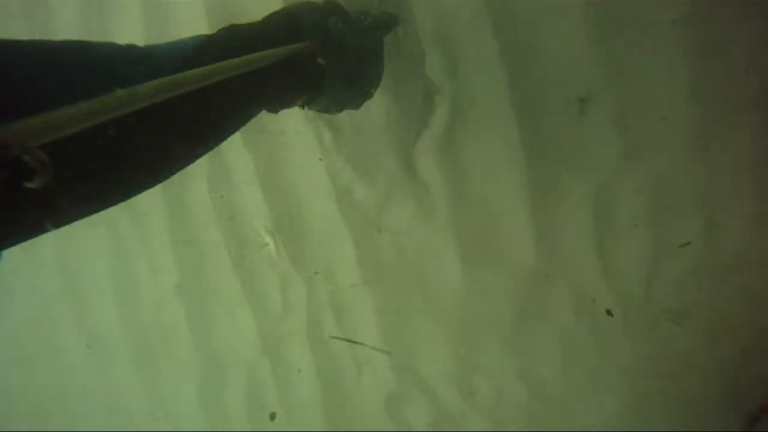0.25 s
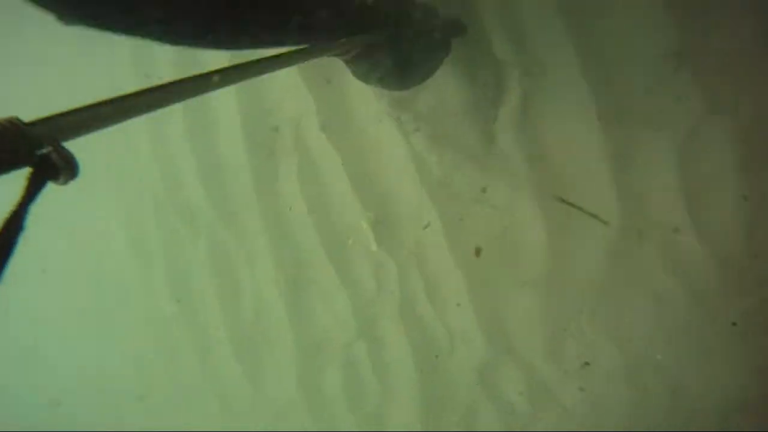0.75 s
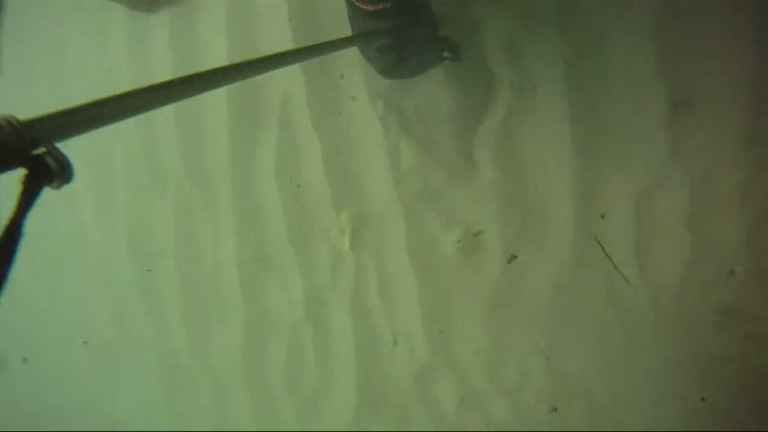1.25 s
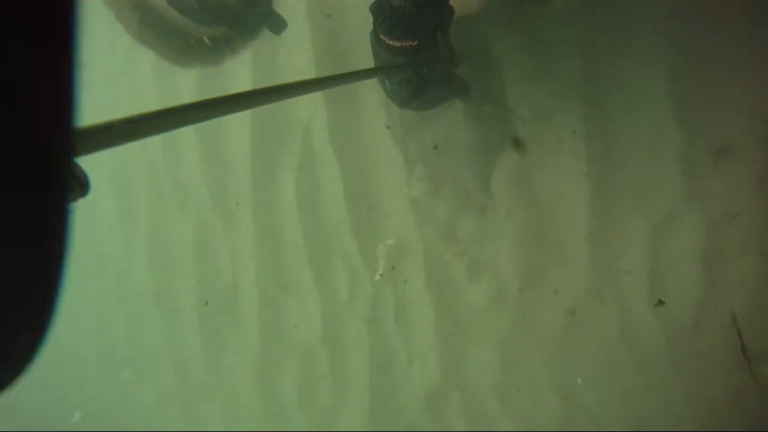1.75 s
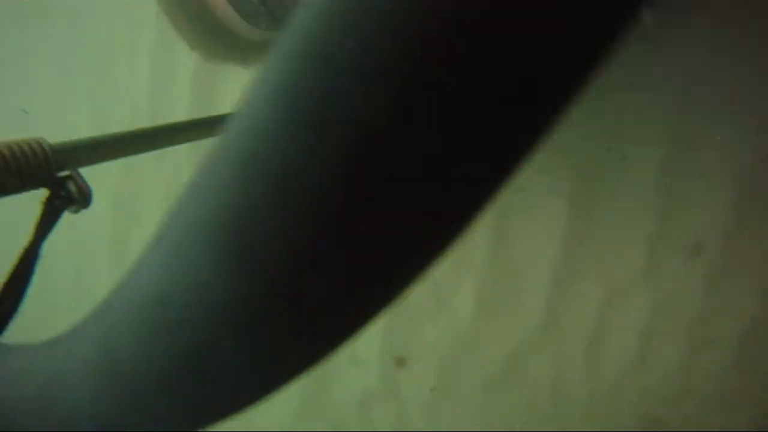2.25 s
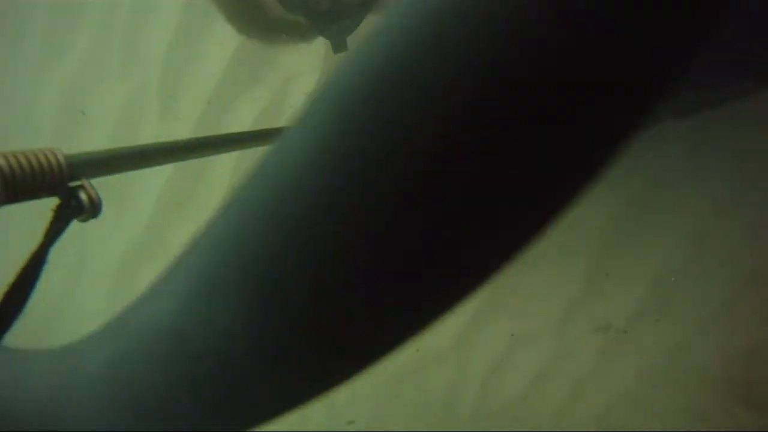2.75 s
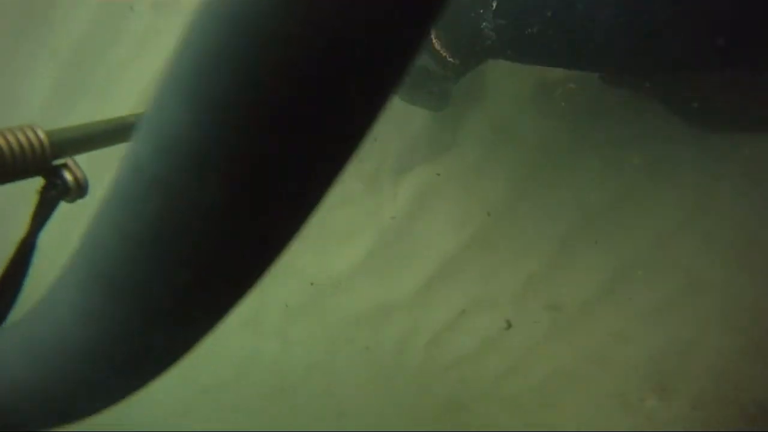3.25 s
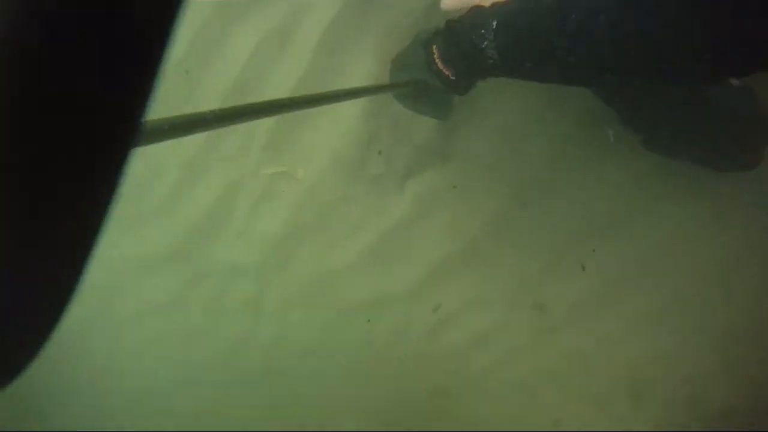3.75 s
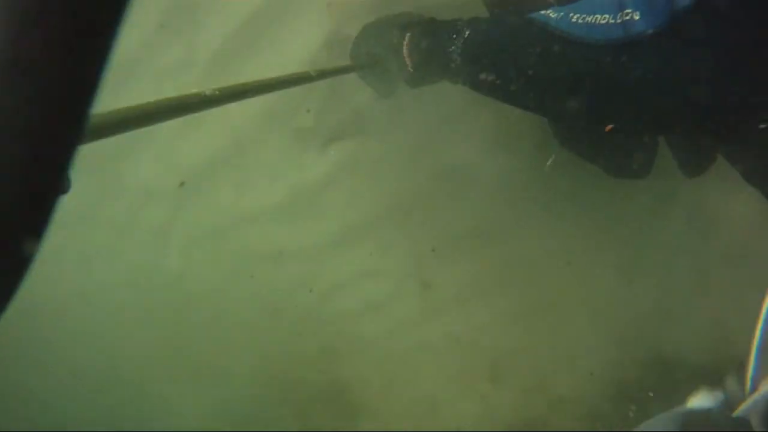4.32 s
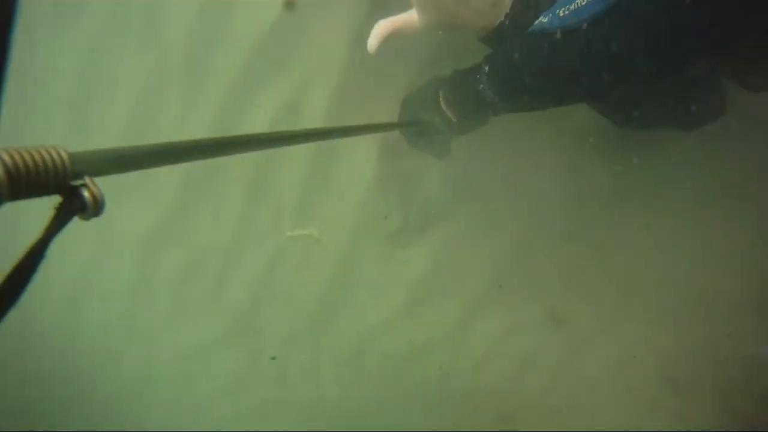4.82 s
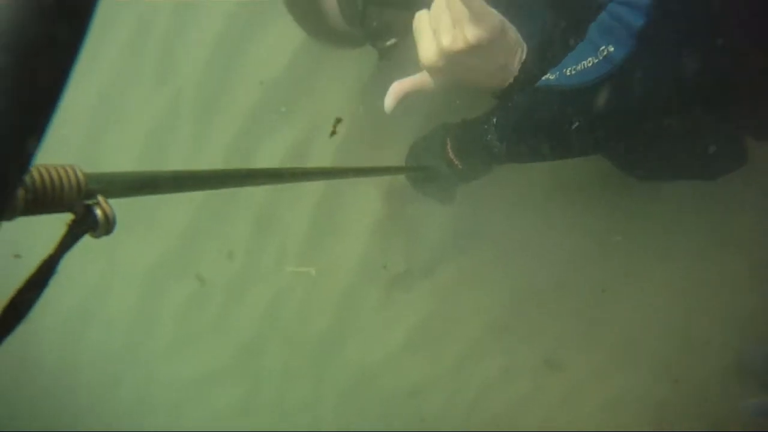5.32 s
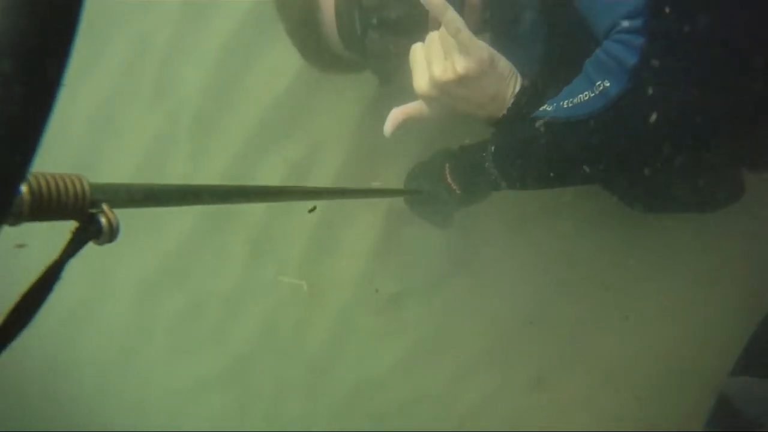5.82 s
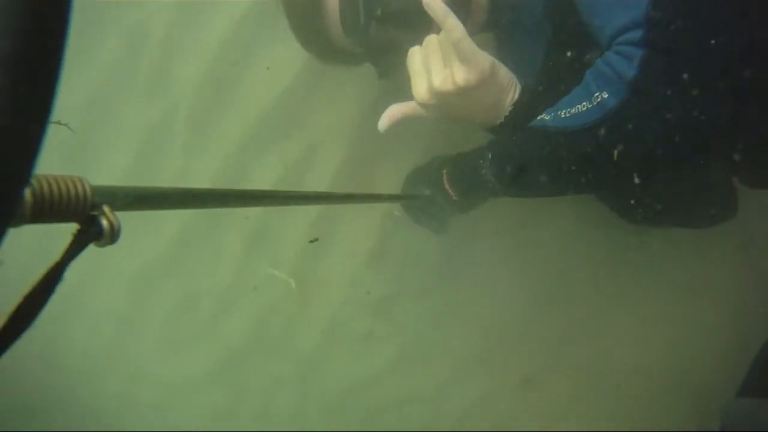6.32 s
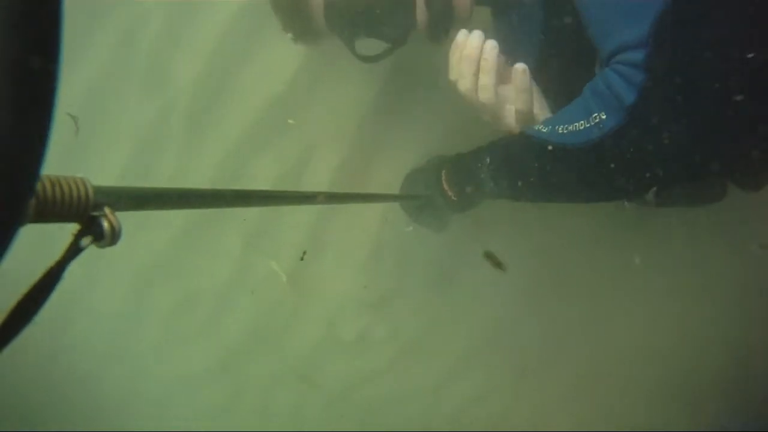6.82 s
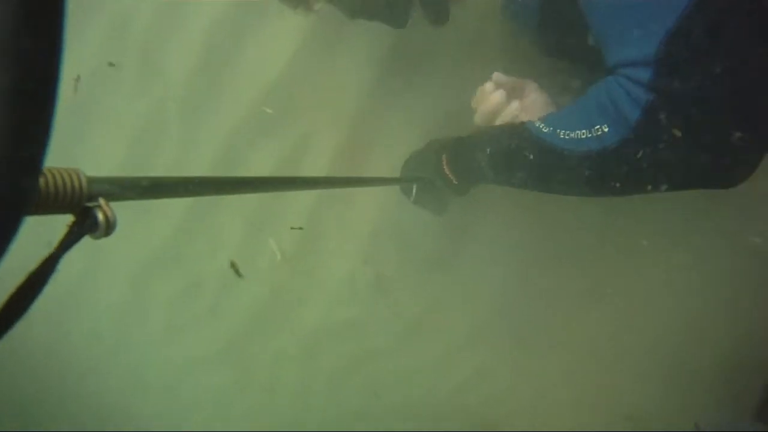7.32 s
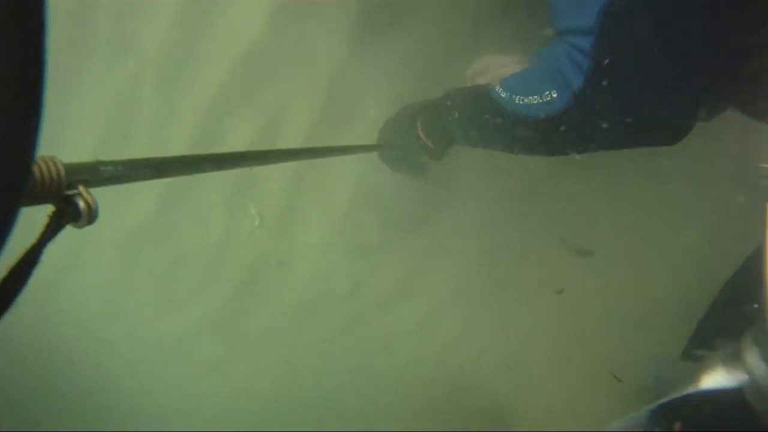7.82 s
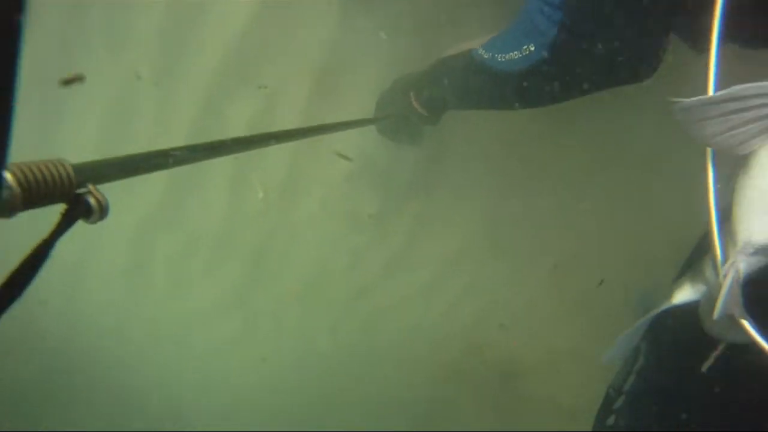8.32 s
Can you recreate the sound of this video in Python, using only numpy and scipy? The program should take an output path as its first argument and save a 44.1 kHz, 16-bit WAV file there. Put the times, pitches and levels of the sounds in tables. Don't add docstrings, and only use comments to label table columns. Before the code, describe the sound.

Close, boxed-in underwater handling noise. Hands and line rub a plastic-like shell while water rocks it with low rumble. A fish beats the spear shaft in irregular short knocks, strongest in the first second, around four seconds and at the end, with brief metallic clinks and scrapes between. Around six to seven seconds it nearly falls quiet. Dry, no echo, crunchy low sampling quality.

```python
import sys
import numpy as np
from scipy import signal
from scipy.fft import rfft, irfft, next_fast_len
from scipy.io import wavfile
from scipy.ndimage import uniform_filter1d, map_coordinates

SR = 44100
rng = np.random.default_rng(int(sys.argv[2]) if len(sys.argv) > 2 else 0)


def volts_from_decibels(level):
    exponent = np.asarray(level, float) / 20
    return 10 ** exponent


def to_wav(sig):
    pcm = np.clip(np.atleast_2d(sig), -1, 1) * 32767
    pcm = np.round(pcm).astype(np.int16)
    wavfile.write(sys.argv[1], SR, pcm.T)


N = 377937


def unit(x):
    return x / np.sqrt(np.mean(x ** 2) + 1e-20)


def curves(rows):
    s, *cols = np.transpose(rows)
    return [np.interp(np.arange(N) / SR, s, c) for c in cols]


def wobble(rate_hz):
    knots = rng.standard_normal(int(N * rate_hz / SR) + 4)
    return map_coordinates(knots, [np.arange(N) * rate_hz / SR])


def filtered(x, response):
    m = next_fast_len(len(x) + SR // 2)
    return irfft(rfft(x, m) * response(np.fft.rfftfreq(m, 1 / SR)), m)[:len(x)]


def band(x, low_hz, high_hz):
    return signal.sosfilt(signal.butter(4, [low_hz, high_hz], "bandpass", fs=SR, output="sos"), x)


def coloured(spectrum):
    f, db = np.transpose(spectrum)
    return unit(filtered(rng.standard_normal(N), lambda hz: volts_from_decibels(np.interp(np.log(hz + 1), np.log(f), db))))


def resonant(x, peaks):
    def response(f):
        total = 0
        for k, (hz, width_hz, db) in enumerate(peaks):
            damping = 1j * f * width_hz
            total = total + (-1) ** k * volts_from_decibels(db) * damping / (hz * hz - f * f + damping)
        return total
    return filtered(x, response)


def gritty(grit_db, rate_hz):
    return rng.standard_normal(N) * volts_from_decibels(grit_db * wobble(rate_hz))


# t/s, level/dB
GRIP = [(0.0, -35.5), (0.81, -37.5), (1.6, -43), (2.1, -41), (2.53, -39.5), (2.74, -48), (3.7, -40),
        (3.98, -35.5), (4.46, -35), (4.75, -31), (4.94, -39), (6.01, -53.5), (6.3, -48), (7.81, -44),
        (7.95, -36), (8.07, -30), (8.19, -52.5), (8.57, -45.5)]


def grip_level():
    return curves(GRIP)[0]


# f/Hz, width/Hz, level/dB
HUM = [(750.5, 81, 0)]


def hum():
    noise = rng.standard_normal(N)
    return volts_from_decibels(grip_level() - 6) * unit(resonant(resonant(noise, HUM), HUM))


# t/s, level/dB
WATER = [(0.0, -33.5), (0.31, -25.5), (0.55, -37.5), (0.83, -23.5), (1.65, -39.5), (1.72, -31),
         (2.6, -38.5), (2.79, -23), (2.89, -33.5), (4.77, -28.5), (5.06, -42.5), (5.13, -35), (6.32, -58),
         (7.16, -44.5), (7.21, -36), (7.49, -49), (7.9, -31), (8.57, -26)]
# f/Hz, level/dB per Hz
SWAY = [(7, -44.5), (14, -13.5), (21, 11.5), (28, -3.5), (40, -7.5), (60, -19), (130, -86)]


def water_sway():
    sway_db, = curves(WATER)
    rock = coloured(SWAY)
    steady = np.sqrt(uniform_filter1d(rock ** 2, size=SR // 6) + 0.08)
    return volts_from_decibels(sway_db + 2.5) * unit(rock / steady)


def wash():
    kicks, t = np.zeros(N), np.arange(SR // 2) / SR
    for s, db, _, thud_db, _ in BEATS + JOLTS:
        kicks[round(s * SR)] = volts_from_decibels(db + thud_db - 11)
    decay_s = 0.027
    return np.abs(signal.fftconvolve(kicks, np.exp(-t / decay_s))[:N])


# f/Hz, level/dB per Hz
RUMBLE = [(30, -65), (60, -3), (110, -5), (190, -9), (300, -8.5), (520, -10.5), (650, -23), (1200, -77.5)]


def rumble(catch):
    churn = volts_from_decibels(-49 + grip_level() + 42.5) + wash()
    return churn * unit(volts_from_decibels(1.8 * wobble(14) + 1.6 * catch) * coloured(RUMBLE))


# middle t/s, level/dB, share on metal/dB, half length/s
STROKES = [(3.297, -64, -31, .06), (8.334, -47, -16, 0.018), (8.425, -37.5, -17, 0.029),
           (0.01, -38, -46, 0.094), (0.386, -32, -19, 0.14), (0.673, -32.5, -15.5, 0.069),
           (0.975, -33.5, -24, 0.1), (1.29, -41.5, -17.5, 0.17), (1.434, -36, -16, 0.043),
           (1.648, -39.5, -6, 0.031), (1.85, -44, -8.5, 0.11), (2.043, -42.5, -9.5, 0.032),
           (2.226, -35, -11, 0.042), (2.47, -35.5, -30, 0.044), (3.008, -34, -32.5, 0.044),
           (3.159, -39.5, -42, 0.062), (3.426, -39, -16.5, 0.053), (3.586, -33, -26.5, 0.068),
           (3.758, -34.5, -26, 0.053), (4.123, -37, -19.5, 0.091), (4.345, -32, -16, 0.045),
           (4.54, -30, -25, 0.12), (4.708, -51, -6.5, 0.097), (4.873, -33.5, -19.5, 0.051),
           (5.195, -40.5, -25, 0.056), (6.343, -46, -27, 0.14), (7.181, -38.5, -44, 0.047),
           (7.36, -46, -47, 0.043), (7.783, -40, -12, 0.05), (7.93, -35.5, -20, 0.052),
           (8.156, -31, -23, 0.018), (8.51, -53, -14, 0.01)]


def strokes():
    s, db, metal_db, half_s = np.transpose(STROKES)[:, :, None]
    t = np.arange(0, N, SR // 200) / SR
    bells = volts_from_decibels(db) * np.exp(-np.square((t - s) / half_s))
    shell, metal = curves(np.transpose([t, bells.sum(axis=0), (volts_from_decibels(metal_db) * bells).sum(axis=0)]))
    return shell, metal + volts_from_decibels(-63 + 0.49 * (grip_level() + 41.5))


# f/Hz, width/Hz, level/dB
RUSTLE = [(334, 28, -17.5), (414, 43, -7.5), (725.4, 37, 0.5), (879, 136, -0.5), (1078, 145, -9)]
# f/Hz, width/Hz, level/dB
BED = [(350, 52, -15), (757, 56, 0), (862, 86, 1), (1130, 60, -7.5)]
# f/Hz, width/Hz, level/dB
RASP = [(934, 109, 4.5), (1090, 103.4, 0), (1234, 56, -11)]
# f/Hz, width/Hz, level/dB
GRAZE = [(1550, 120, -1.5), (1804, 140, 1.5), (1890, 410, -5), (2690, 390, -10.5)]


def rubbing(catch):
    shell, metal = strokes()
    hold = volts_from_decibels(grip_level() - 8.5)
    force = volts_from_decibels(2.54 * catch) * gritty(2.38, 150)
    rustle = volts_from_decibels(4) * shell * unit(resonant(force, RUSTLE))
    bed = volts_from_decibels(-1) * hold * unit(resonant(force, BED))
    hardness = (volts_from_decibels(47) * shell + volts_from_decibels(43.5) * hold) ** 1.154
    rasp = volts_from_decibels(-45.5) * hardness * unit(resonant(force, RASP))
    graze = volts_from_decibels(-1) * metal * unit(volts_from_decibels(1.6 * catch) * resonant(gritty(4.5, 200), GRAZE))
    return band(rustle + bed + rasp, 90, 1650) + graze


def handling():
    catch = wobble(28)
    return water_sway() + rumble(catch) + rubbing(catch)


# t/s, level/dB, f/Hz, length/s
BUMPS = [(0.002, -24.5, 187, 0.01), (0.395, -30, 150, .015), (0.575, -30, 170, .012),
         (0.745, -23.5, 165, 0.018), (0.867, -25.5, 59, 0.035), (0.93, -27, 60, .02),
         (1.414, -26, 290, 0.0095), (1.93, -27, 311, 0.006), (2.507, -31, 327, 0.026),
         (2.712, -25.5, 46, 0.023), (2.72, -29, 201, 0.005), (3.241, -36, 327, 0.013),
         (3.427, -24, 43, 0.015), (3.87, -24, 75, 0.012), (3.9, -24, 50, .012), (4.27, -32, 230, .015),
         (4.47, -29, 230, .015), (5.12, -24, 48, 0.031), (5.12, -27, 130, 0.021), (5.452, -45, 46, 0.033),
         (6.405, -41, 90, 0.018), (7.138, -36, 245, 0.019), (7.165, -35.5, 63, 0.021),
         (7.777, -22, 89, 0.015), (7.893, -25, 52, 0.026), (8.079, -19, 62, 0.04), (8.32, -42, 300, .01),
         (8.416, -30, 73, 0.04)]


def bumps():
    out, t = np.zeros(N + SR), np.arange(SR // 3) / SR
    for s, db, hz, length_s in BUMPS:
        u = t / length_s
        swing = np.sin(2 * np.pi * hz * (t + 0.3 * length_s * (1 - np.exp(-u))))
        churn = band(rng.standard_normal(3 * len(t)), 0.6 * hz, 1.7 * hz)[-len(t):]
        out[round(s * SR):][:len(t)] += volts_from_decibels(db + 5) * u * np.exp(-u) * (swing + volts_from_decibels(-4) * unit(churn))
    return out[:N]


# t/s, level/dB, bright edge/dB, length/s
CLINKS = [(0.91, -35, 11, 0.013), (1.2047, -19, -3, 0.023), (1.267, -29, 1.5, 0.0044),
          (1.718, -28.5, -7, 0.017), (1.866, -29.5, 3, 0.012), (2.003, -35.5, 15.5, 0.012),
          (2.095, -20.5, -3.5, 0.0098), (2.152, -21.5, -1, 0.0043), (2.239, -33, 13.5, 0.0038),
          (2.262, -32, -4, 0.0058), (2.9244, -28.5, 4, 0.0041), (4.065, -26, -5.5, 0.012),
          (4.919, -29.5, 0.5, 0.0099), (5.0215, -24.5, 6, 0.0074), (5.319, -42.5, -1, 0.02),
          (5.879, -32.5, 7, 0.018), (6.299, -32.5, -2, 0.018), (7.623, -39.5, 3.5, 0.021),
          (8.077, -25.5, 2, 0.013), (8.129, -15, -2.5, 0.0046), (8.164, -23, -1, 0.0042),
          (8.4, -22.5, 4.5, 0.0027), (0.489, -23, 8, .003)]
# t/s, level/dB, bright edge/dB
SCUFFS = [(0.06, -38, -1), (0.4612, -31, 7), (0.4798, -32.5, 5), (1.443, -32, 5), (1.5337, -31.5, 7.5),
          (1.919, -36, 4), (2.176, -28.5, 3), (2.205, -43, 9), (2.244, -35, 11), (2.776, -29, 16.5),
          (3.396, -29, 1.5), (3.722, -37.5, 8), (3.756, -26, 3), (4.137, -27, 5), (4.222, -31, 1),
          (4.3, -24.5, 3.5), (4.373, -38, 3), (4.627, -24.5, 9.5), (4.851, -44, -18), (5.6454, -36.5, 0.5),
          (8.399, -35, 6)]
# t/s, level/dB
TICKS = [(0.7427, -44), (0.845, -47.5), (1.401, -46), (2.342, -52), (2.567, -47), (3.646, -60),
         (4.014, -45.5), (4.18, -48), (5.288, -53.5), (5.404, -51), (5.6, -46), (5.748, -52.5),
         (5.782, -51), (6.089, -44.5), (6.458, -49.5), (6.561, -52.5), (6.613, -48.5), (6.755, -59),
         (6.829, -52), (6.853, -51), (6.891, -52), (7.235, -58.5), (7.054, -44), (7.559, -48.5),
         (8.2, -50.5), (8.235, -52.5), (8.314, -51), (8.337, -57)]
# t/s, level/dB, body/dB, bright edge/dB, length/s
DRAGS = [(0.628, -26.5, 10, 10, 0.028), (1.296, -26, 4, 2, 0.038), (1.574, -43, 4, 3.5, 0.0089),
         (0.765, -36.5, 15, 8, 0.028), (1.699, -35.5, 3.5, -5, 0.12), (1.782, -50, 9, -4, 0.052),
         (1.865, -42.5, 2, 12.5, 0.051), (1.92, -43, 3, 12.5, 0.084), (2.182, -48.5, 0, 12, 0.015),
         (8.406, -44, 19, 6, 0.024), (2.6626, -15, 2.5, 1, 0.02), (2.686, -26.5, 3, -0.5, 0.04),
         (7.164, -67, 31, 1, 0.057)]
# middle t/s, level/dB, body/dB, bright edge/dB, half length/s
SWELLS = [(0.875, -23, 1.5, -3.5, .014), (0.934, -27.5, -1, 6, 0.011), (0.951, -24.5, 11, 7, 0.0053),
          (0.969, -28, 17, 11.5, 0.0029), (2.805, -32, 11, 10, 0.01), (8.232, -53.5, -10, 1, 0.023),
          (1.34, -36, 9.5, 1, 0.0083), (1.595, -39.5, 13, 6, 0.0056), (1.752, -32, -14, -2, 0.0063),
          (1.78, -45, -16, -4, 0.0057), (1.844, -37.5, 8.5, 3, 0.017), (1.655, -39.5, 5, -4, 0.012),
          (1.9, -45.5, -6, 4, .02), (1.963, -49.5, -1, 14, 0.023), (1.174, -48, -9, 10, 0.011),
          (2.212, -27.5, 12.5, 6.5, 0.014), (2.257, -20.5, 5.5, 8.5, 0.0052),
          (2.293, -22, 1.5, 5.5, 0.0099), (4.51, -53, 4, 9, 0.021), (7.197, -73, 24, -4, 0.015),
          (7.325, -58, 19.5, 3, 0.025), (7.984, -47.5, 23, 3, 0.012), (8.138, -34, 18, -1, 0.011)]
# f/Hz, width/Hz, level/dB
METAL = [(1400, 250, -18), (1655, 45, 0), (1770, 55, -1)]
# f/Hz, width/Hz, level/dB
EDGE = [(2015, 200, -5), (2256, 94, -2.5), (2542, 230, -3.5), (2986, 490, -16)]
# f/Hz, width/Hz, level/dB
SCUFF = [(343, 43, -5), (531, 76, -6), (766, 76, 2), (950, 254, -2.5), (1137, 161, 0)]
# f/Hz, width/Hz, level/dB
LOOSE = [(1150, 77, 9), (760, 72, -12)]


def scrapes():
    grip, t = np.zeros((4, N + SR)), np.arange(SR // 8) / SR
    contacts = [(s, db, 0.5, edge_db, length_s) for s, db, edge_db, length_s in CLINKS]
    contacts += [(s, db, 10.5, edge_db, 0.0075) for s, db, edge_db in SCUFFS]
    contacts += [(s, db, -3.5, 9.5, 0.015) for s, db in TICKS]
    for rows, stop, bite in ((contacts, 1.6, 1.2), (DRAGS, 4.5, 0.3)):
        onset = (1 - np.exp(-t / 0.0021)) * (1 + bite * np.exp(-t / 0.00058))
        for s, db, body_db, edge_db, length_s in rows:
            drag = np.exp(-(t / length_s) ** stop) * onset
            level = volts_from_decibels(db + np.array([[-5], [edge_db - 12.5], [body_db - 5.5]]))
            grip[:3, round(s * SR):][:, :len(t)] += level * drag
    middle = t[-1] / 2
    for s, db, body_db, edge_db, half_s in SWELLS:
        bell = np.exp(-np.abs((t - middle) / half_s) ** 2.7)
        level = volts_from_decibels(db + np.array([[-5], [edge_db - 15], [body_db - 8.5]]))
        grip[:3, round((s - middle) * SR):][:, :len(t)] += level * bell
    for s, db in TICKS:
        grip[3, round(s * SR):][:len(t)] += volts_from_decibels(db + 0.5) * np.exp(-t / 0.014) * (1 - np.exp(-t / 0.001))

    happens = rng.random((3, N)) < 1700 / SR
    jerks = happens * rng.uniform(-0.83, 1, (3, N)) * volts_from_decibels(0.65 * wobble(140))
    jerks[:, [round((row[0] + 0.0015) * SR) for row in contacts + DRAGS]] = 0.76
    out = np.zeros(N)
    for force, gain, body in zip([*jerks, jerks[2]], grip, (METAL, EDGE, SCUFF, LOOSE)):
        out += resonant(force * gain[:N], body) / np.std(resonant(force[:SR], body))
    return out


def ring(modes, t, favour_hz, focus_db):
    hz, db, t60_s = np.transpose(modes)[:, :, None]
    chance = rng.standard_normal(hz.shape)
    level_db = db + 1.5 * chance - focus_db * np.abs(np.log2(hz / favour_hz))
    detuned_hz = hz * (1 + 0.016 * chance[::-1])
    return np.sum(volts_from_decibels(level_db - 60 * t / t60_s) * np.sin(2 * np.pi * detuned_hz * t), axis=0)


# f/Hz, level/dB, t60/s
SHELL = [(715, 9.5, 0.024), (773, -10.5, 0.034), (822, -10.5, 0.055), (914.5, 7, 0.028),
         (1132.3, -7.5, 0.047), (1110, -6.5, 0.045)]
# f/Hz, level/dB, t60/s
FRAME = [(138.5, -4.5, 0.17), (167.5, -7.5, 0.25), (230, -4, 0.11), (350.3, -7, 0.091), (433.5, 3, 0.052),
         (520, -3.5, 0.071)]


def blow(hz, thud_hz, push_s, low_hz, high_hz):
    t = np.arange(SR // 8) / SR
    early = t[:SR // 14]
    u = early / push_s
    rough = rng.standard_normal(len(u))
    judder = volts_from_decibels(-29.5) * np.minimum(u, 1) * np.exp(-early / 0.023) * rough
    push = u ** 3 * np.exp(-1.7 * u) * rough + judder
    shove = volts_from_decibels(-12.5) * np.exp(-((u - 1.5) / 0.22) ** 2) + 0.3 * push
    chord = ring(SHELL, t, hz, focus_db=30)
    clean = chord * (1 - np.exp(-t / (1.44 * push_s))) ** 2
    juddered = signal.fftconvolve(chord, push)[:len(t)]
    high = band(unit(clean) + volts_from_decibels(-3.5) * unit(juddered), low_hz, high_hz)
    low = band(signal.fftconvolve(ring(FRAME, t, thud_hz, focus_db=7), shove)[:len(t)], 110, 574)
    return high / np.abs(high).max(), low / np.abs(low).max()


# t/s, level/dB, ring f/Hz
TAPS = [(0.848, -14.5, 910), (0.921, -19, 950), (1.205, -14.5, 1110), (1.929, -12.5, 950),
        (1.937, -16, 950), (2.094, -9.5, 1130), (2.199, -16.5, 1110), (5.025, -19.5, 1090),
        (5.598, -28, 910), (5.643, -24, 1170), (5.878, -21, 1110), (6.085, -47, 1150), (6.3, -25.5, 1200)]
# t/s, level/dB, ring f/Hz, thud/dB, thud f/Hz
JOLTS = [
    (2.982, -20, 970, 2.5, 230),
    (3.363, -26, 790, -1, 230),
    (3.866, -51, 950, 23.5, 160),
    (3.965, -20, 1000, 4.5, 230),
    (4.465, -15.5, 724, -10.5, 230),
    (7.769, -35, 747, 11.5, 430),
    (7.968, -22.5, 930, -19, 300),
    (8.104, -19, 810, 5, 371),
    (8.195, -19.5, 720, -11, 400),
]
# t/s, level/dB, ring f/Hz, thud/dB, thud f/Hz
BEATS = [(0.386, -0.5, 777, -16, 403), (0.423, -20, 950, -19.5, 398), (0.479, 4.5, 715, -11, 346),
         (0.485, -17.5, 750, -3, 334), (0.574, -1, 908, -15.5, 327), (0.674, -4, 828, -11, 327),
         (0.728, -18, 950, -10, 390), (0.735, -4, 876, -8, 417), (1.106, -22.5, 840, -6, 305),
         (1.227, -8.5, 975, -19.5, 300), (2.426, -29.5, 760, -12, 330), (3.397, -4.5, 700, -4.5, 370),
         (4.198, -20, 930, -10.5, 298), (4.293, -15.5, 940, -20, 298), (4.369, -3.5, 704, -10, 230),
         (4.421, -11.5, 710, -15, 230), (4.5, -14, 1026, -15.5, 230), (4.849, -21, 760, -33, 302),
         (5.086, -25, 1060, -16, 300), (5.112, -25.5, 990, -30, 159), (7.724, -23.5, 1070, -34, 300),
         (7.795, -18.5, 720, -9, 230), (7.864, -14, 760, -3, 520), (7.899, -21, 755, -2.5, 398),
         (7.925, -14.5, 736, -8.5, 350), (8.032, -10.5, 690, -10.5, 350), (8.076, -5, 820, -1, 418),
         (8.164, 6, 745, -10, 440), (8.32, -41, 800, -1, 357), (8.399, 2.5, 840, -10, 420)]


def blows():
    out = np.zeros(N + SR)
    rows = [(*r, 0.001845, 600, 1181) for r in BEATS]  # push/s, ring band/Hz
    rows += [(*r, 0.0022, 600, 1181) for r in JOLTS]
    rows += [(s, db, hz, -38.5, 300, 0.0005, 0.738 * hz, 1450) for s, db, hz in TAPS]
    for s, db, hz, thud_db, thud_hz, push_s, low_hz, high_hz in rows:
        high, low = blow(hz, thud_hz, push_s, low_hz, high_hz)
        out[round(s * SR):][:len(high)] += volts_from_decibels(db) * high + volts_from_decibels(db + thud_db + 5.5) * low
    return out[:N]


def scene():
    return np.tile(hum() + handling() + bumps() + scrapes() + blows(), (2, 1))


def top_cut(x):
    return signal.sosfilt(signal.butter(12, 8320, fs=SR, output="sos"), x)


def record(dry):
    step_hz = 6000
    x = np.clip(dry[0] + volts_from_decibels(-62.5) * rng.standard_normal(N), -1.4, 1.4)
    x = filtered(x, lambda hz: np.clip(1 - (hz / (step_hz / 2)) ** 12.6, 0, 1))
    count = N * step_hz // SR
    samples = np.interp(np.arange(count) * SR / step_hz, np.arange(N), np.clip(x, -1.1, 1.1))
    steps = np.repeat(samples, 8)
    held = signal.resample_poly(steps, SR // 300, 8 * step_hz // 300)
    held = np.pad(held, (0, N))[:N] + volts_from_decibels(-70.5) * rng.standard_normal(N)

    def edge(hz):
        return volts_from_decibels(np.interp(hz, [7640, 7640, 8250, 8450, 9000], [-1.0, -14, -32, -57.5, -120]))

    x = np.clip(filtered(held, edge), -1, 1)
    z = signal.stft(x, nperseg=2048)[2]
    patches = unit(uniform_filter1d(rng.standard_normal(z.shape), size=40, axis=0))
    differs = (patches > 1.5) * rng.standard_normal(z.shape)
    apart = signal.istft(z * differs, nperseg=2048)[1][:N]
    return top_cut(x + volts_from_decibels(-19) * np.array([apart, -apart]))


dry = scene()
out = record(dry)
to_wav(out)
```